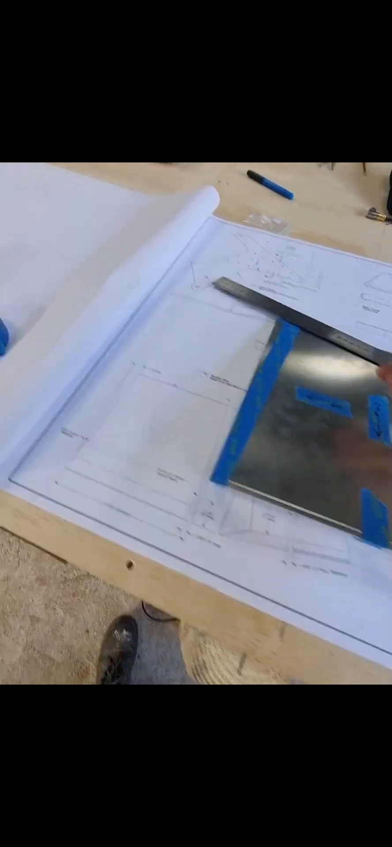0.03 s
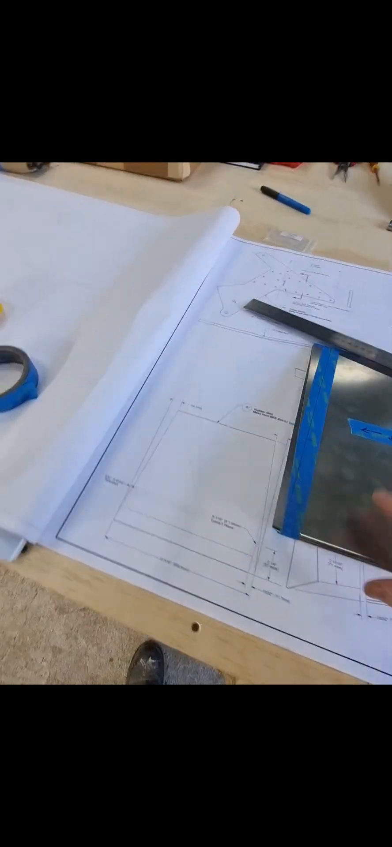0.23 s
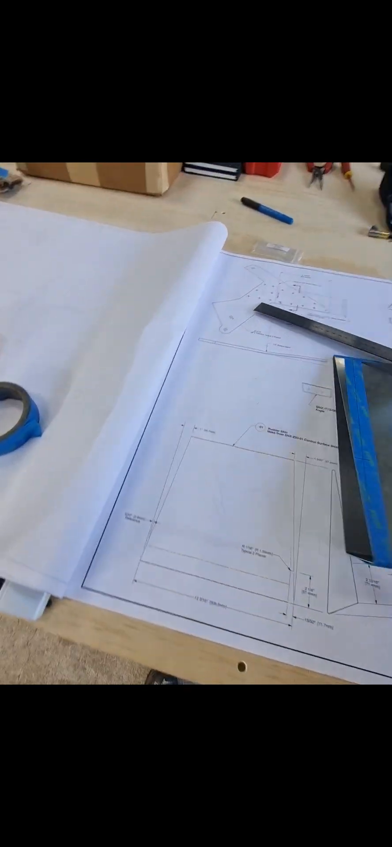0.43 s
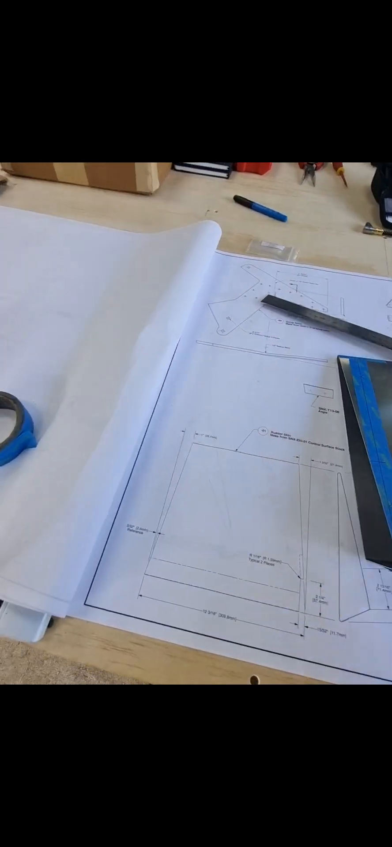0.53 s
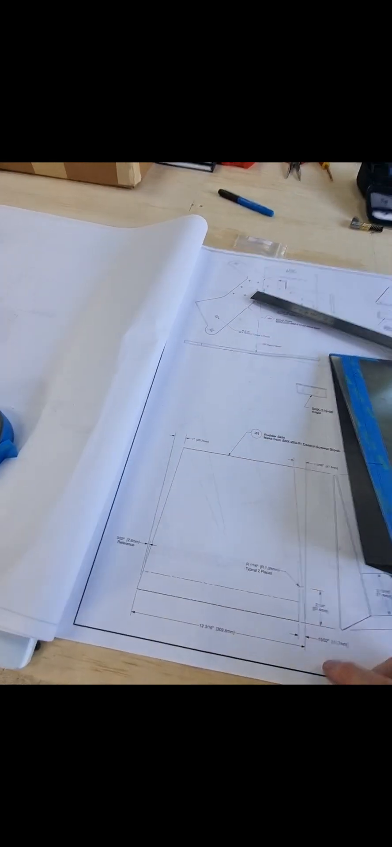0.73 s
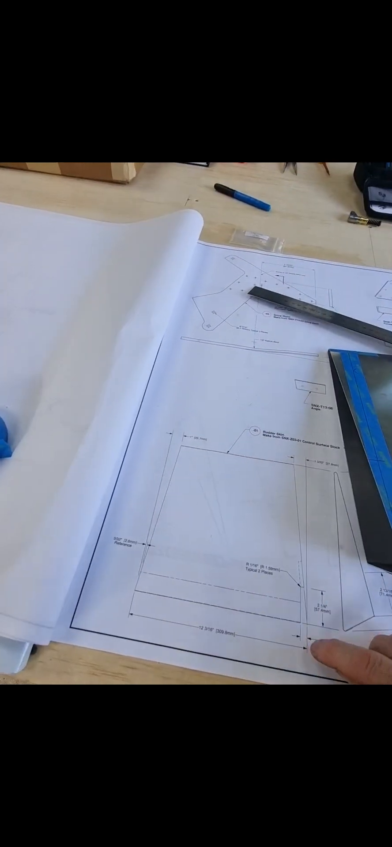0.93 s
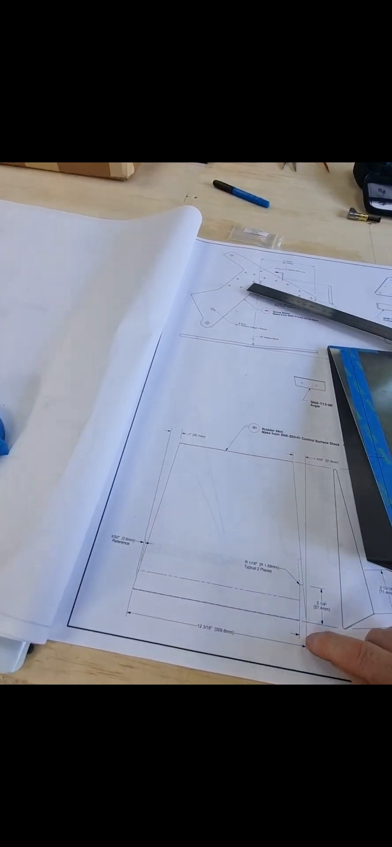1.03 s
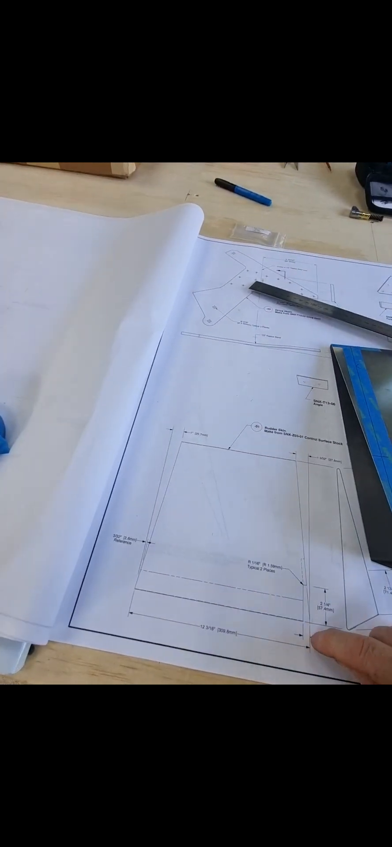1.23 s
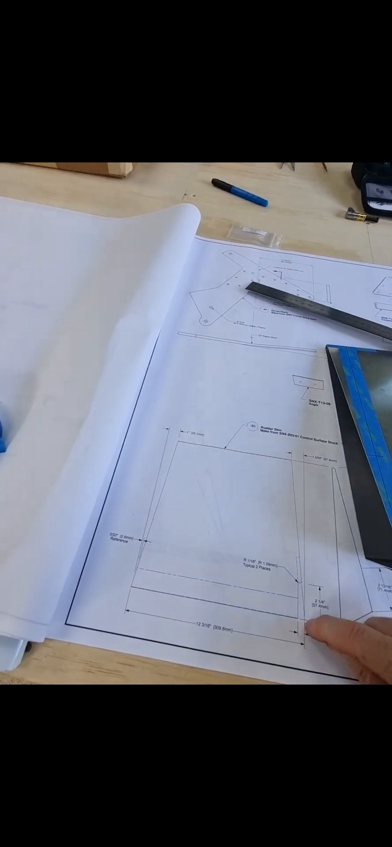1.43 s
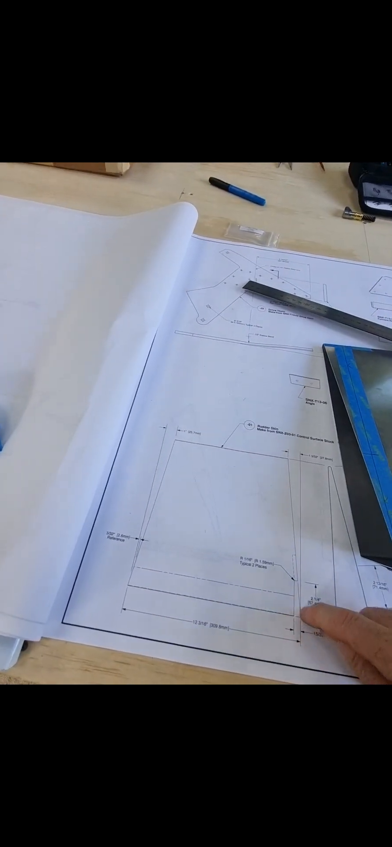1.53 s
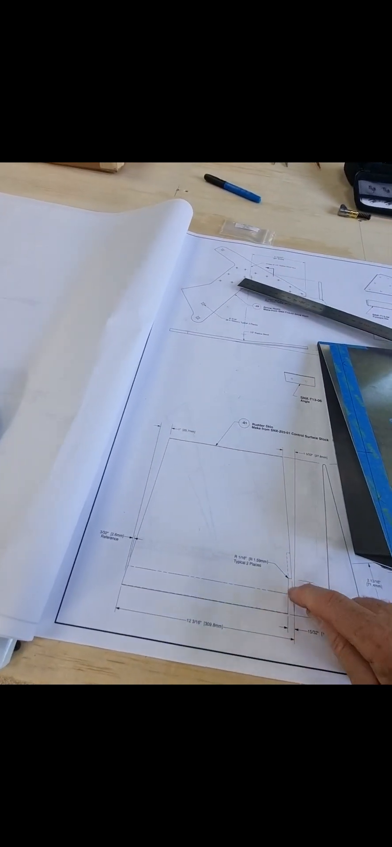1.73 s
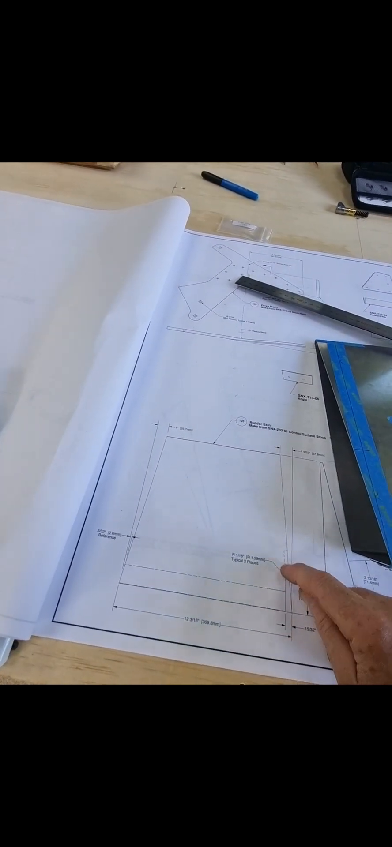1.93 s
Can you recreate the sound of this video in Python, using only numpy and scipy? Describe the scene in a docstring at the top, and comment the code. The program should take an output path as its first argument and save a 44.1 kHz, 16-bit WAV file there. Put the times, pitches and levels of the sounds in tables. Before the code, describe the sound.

A steel sheet scrapes and clatters across paper on a wooden bench, then settles into quiet

```python
"""A steel sheet is pushed over a paper drawing on a wooden bench, above a faint workshop hum.
0-0.3 s: its edge catches, judders and rasps: grainy noise booms the bench modes and rings the steel.
0.3-0.8 s: it glides off in swishes of friction noise, then settles with soft clicks and wooden notes.
From 0.5 s: fingertips stroke the paper in short bright noises and thump it dully; a crease snaps at 0.85 s.
From 1.7 s: a hand starts to sweep over the paper, as swelling, smeared friction noise."""
import sys
import numpy as np
from scipy import signal
from scipy.fft import rfft, irfft
from scipy.io import wavfile

SR = 44100
rng = np.random.default_rng(int(sys.argv[2]) if len(sys.argv) > 2 else 0)


def digitize_waveform(pressure):
    """Quantize a signal to 16-bit integers and store it at the path in sys.argv[1].

    Rows of a 2-D input are taken as channels; values are limited to [-1, 1].
    """
    field = np.atleast_2d(pressure).T
    bounded = np.clip(field, -1, 1)
    quanta = np.round(bounded * 32767).astype(np.int16)
    wavfile.write(sys.argv[1], SR, quanta)


N = 88200
T = np.arange(N) / SR

# Motor hum partials: pitch_hz, level_db
HUM_PARTIALS = [(70.5, -56), (111.4, -52), (222.8, -68.5), (588, -77.5)]
# Hum level over time: time_s, gain_db
HUM_GAIN = [(0, -0.5), (.9, -2.5), (1.4, -3.5), (1.7, -0.5), (1.82, 5), (2, -2)]
# Room air spectrum: freq_hz, density_db
AIR_SPECTRUM = [(20, -13.5), (45, -6.5), (75, -3.5), (110, -4), (160, -11.5), (250, -15), (360, -23.5),
                (580, -22.5), (750, -27), (1150, -31.5), (1500, -41.5), (2500, -48.5), (5000, -56),
                (15500, -60)]
# Room air level over time: time_s, gain_db
AIR_GAIN = [(0, 6), (.85, 5), (1, 0), (1.55, 2), (1.72, 4), (2, 6.5)]
# Thin steady hiss spectrum: freq_hz, density_db
HISS_SPECTRUM = [(300, -32), (3000, -26), (5700, -27.5), (6200, -25), (6700, -3), (7700, -0.5),
                 (9200, -9.5), (13000, -3), (15500, -9.5)]
HUM_WAVER_RAD, AIR_DB, HISS_DB = .12, -58, -63

# Fingertip strokes on the paper: start_s, length_s, level_db
FINGER_STROKES = [(.525, .07, -79), (0.633, 0.043, -55.5), (0.821, 0.036, -53.5), (1.008, 0.04, -56),
                  (1.197, .075, -59), (1.36, .04, -63), (1.403, .05, -57.5), (1.533, 0.038, -61.5)]
# Fingertip friction spectrum: freq_hz, density_db
FINGER_SPECTRUM = [(300, -29), (3000, -31), (6000, -26), (7300, -6), (8200, 8.5), (9500, -3.5),
                   (11000, 0.5), (13300, 7.5), (14300, -22), (16000, -22)]
# Hand sweep level over time: time_s, level_db
PALM_LEVEL = [(1.72, -65.5), (1.885, -61.5), (1.905, -54), (1.955, -48.5), (1.985, -41), (2, -39)]
# Palm friction spectrum: freq_hz, density_db
PALM_SPECTRUM = [(100, 0), (450, 2), (1200, -7.5), (2500, -14), (5000, -14), (6300, -3.5), (7800, 4.5),
                 (9500, -2.5), (11000, -15.5), (15500, -6.5)]
STROKE_ATTACK_S, STROKE_RELEASE_T60_S = .018, .23
FINGER_LEFT_MINUS_RIGHT_DB, PALM_LEFT_MINUS_RIGHT_DB = -2, 1

# Soft knocks of the settling sheet:
# start_s, note_db, note_hz, note_t60_s, click_db, click_t60_s, click_tilt_db_per_octave
SETTLING_TAPS = [(.5885, -47.5, 519, 0.33, -35, 0.029, -1), (0.7436, -41.5, 520, 0.024, -66.5, .02, -2),
                 (0.7508, -31.5, 590, 0.021, -44, 0.016, -0.5)]
# Dull wooden tail spectrum: freq_hz, density_db
WOOD_SPECTRUM = [(150, -23), (400, 5), (600, -2.5), (850, -3), (1200, -13), (1800, -29), (2500, -43),
                 (15000, -34)]
WOOD_DB, WOOD_T60_S = -11, .074  # dB relative to the note

# Snap of a paper crease: start_s, level_db, t60_s
CREASE_SNAPS = [(.852, -38.5, 0.0094)]
# Crease spectrum: freq_hz, density_db
SNAP_SPECTRUM = [(300, -26.5), (3300, -28), (4900, 5), (6000, -3), (7700, 2.5), (9000, -17), (15000, -12)]
# Glides of the flat face, then two dull finger thumps on the paper (0.864 and 1.1 s):
# peak_s, rise_s, fall_s, level_db, tilt_db_per_octave
GLIDES_AND_THUMPS = [(.36, 0.031, 0.013, -40.5, -12.5), (0.453, 0.11, 0.041, -40, -0.5),
                     (.55, .02, 0.06, -51, -0.5), (0.601, 0.018, 0.01, -45.5, -6.5),
                     (0.864, 0.021, 0.037, -63, -9), (1.1, 0.013, 0.027, -65.5, -10.5)]
# Paper spectrum: freq_hz, density_db
PAPER_SPECTRUM = [(80, -1.5), (400, -6), (750, -2.5), (1700, 2), (3000, 2.5), (5000, -0.5), (7800, 1.5),
                  (10000, -5.5), (15500, -4)]
GLIDE_RING_DB = -9

# Corner rasp: peak_s, rise_s, fall_s, level_db
CORNER_RASPS = [(.295, .04, 0.017, -33)]
# Corner scratch spectrum: freq_hz, density_db
CORNER_SPECTRUM = [(300, -27.5), (800, -8), (1300, -2), (1500, 4.5), (1700, 9.5), (2200, 3), (2500, -17),
                   (4600, -40.5), (5000, -4.5), (7200, -4.5), (8500, -29), (10200, -11), (15500, -16)]

# Judder of the sheet on the bench: time_s, pitch_hz, level_db
JUDDER_TRACK = [(.04, 85, -42.5), (.08, 92, -26.5), (0.128, 102, -23.5), (.2, 92, -33.5), (.235, 125, -34),
                (.29, 155, -31.5), (.335, 145, -38), (.375, 112, -40), (.46, 105, -49.5), (.55, 105, -68),
                (.7, 105, -90)]
JUDDER_WIDTH_HZ = 60

# Drag of the sheet: time_s, rumble_db, scrape_db
DRAG_LEVELS = [(0, -31.5, -35), (.016, -28.5, -33), (.021, -16, -27), (.052, -28, -28),
               (.064, -16.5, -30.5), (.11, -17, -31.5), (.14, -22.5, -29.5), (.175, -30, -45),
               (.195, -24, -78.5), (.228, -25.5, -47), (.246, -22.5, -33.5), (.268, -28.5, -69),
               (.295, -32, -42), (.35, -39.5, -66), (.42, -53.5, -63), (.52, -54.5, -58.5),
               (.61, -49.5, -63.5), (.72, -63, -66), (.95, -85, -100)]
# Hard catches of the edge: start_s, thud_db, clink_db
EDGE_KNOCKS = [(0.019, -37.5, -16), (0.0605, -21.5, -37.5), (0.069, -21, -24.5), (0.0917, -34, -30.5),
               (0.1345, -53, -34), (0.191, -22.5, -64), (0.209, -24.5, -30.5), (0.2795, -37.5, -38),
               (0.649, -48, -69)]
# Bench top and flexing sheet spectrum: freq_hz, density_db
BENCH_SPECTRUM = [(20, -50.5), (38, -41.5), (55, -9.5), (85, 3), (135, -4.5), (200, -2), (300, -4),
                  (390, 3), (480, -2), (600, -6.5), (690, -11.5), (820, -14.5), (1000, -11), (1290, -16),
                  (1600, -20), (2100, -19.5), (2600, -25.5), (5000, -47.5), (16000, -66.5)]
# Low resonances of the bench with the sheet on it: pitch_hz, level_db, t60_s
BENCH_RESONANCES = [(104, 0, .22), (151, -3, .22), (185, -3, .22), (228, -3, .22), (266, 0, .25),
                    (329, -3, .22), (383, 0, .18), (507, 2, .22), (589, 1, .2), (621, -5, .22)]
# Scraping edge spectrum: freq_hz, density_db
EDGE_SPECTRUM = [(100, -29.5), (700, -7), (1400, 1), (2600, -8), (4000, -2), (4680, -5), (4900, 3),
                 (5250, 1), (6200, -2.5), (7500, -4), (9000, -12), (11000, -11), (13000, -15.5),
                 (15500, -10.5)]
# Resonances of the steel: pitch_hz, level_db, t60_s
STEEL_RESONANCES = [(985, -3, .25), (1195, -1, .35), (1265, 2, .4), (1315, 0, .35), (1470, -3, .25),
                    (1853, -1, .35), (2130, -5, .25), (2789, -8, .3), (4100, -8, .2), (4840, -2, .4),
                    (4905, -2, .4), (4958, 0, .45), (5141, 2, .32), (5330, -2, .32), (5520, -3, .2),
                    (5880, -3, .2), (6174, -1, .28), (8183, -7, .22)]
CATCHES_PER_S, CATCH_SPREAD_DB, SMOOTH_SHARE = 800, 3.6, .3
THUD_T60_S, CLINK_T60_S = .083, .048
STRIKE_DB, STRIKE_T60_S = 3, .002  # dB relative to the thud
RUMBLE_DB, BOOM_DB, RING_DB = -2.5, -9.5, -3.5
DIRECT_DB, CLATTER_T60_S = -10, .025
SHIMMER_DB, SHIMMER_T60_S = -3.5, .26

# Stereo width: freq_hz, side_minus_mid_db
STEREO_WIDTH = [(60, -13), (200, -25), (380, -20.5), (560, -6), (750, -5.5), (1290, -1), (2400, 0.5),
                (5000, 1), (15000, 1)]
# Colour difference of the two microphones: freq_hz, left_minus_right_db
MICROPHONE_LEAN = [(60, 0.5), (200, 1.5), (380, 0), (750, -2), (1300, 0.7), (2400, 1.7), (4400, -1.5),
                   (8000, -1), (10000, -4), (14500, 2)]
# Room decay: freq_hz, t60_s
ROOM_DECAY = [(100, 0.38), (500, 0.4), (2000, 0.44), (6000, 0.21), (15000, 0.11)]
ROOM_DB, LOW_CUT_HZ, CUT_HZ = -11.5, 38, 15800


def amp(db):
    """Decibels to gain."""
    return 10 ** (np.asarray(db) / 20)


def unit(x):
    """Scales to rms 1."""
    return x / np.sqrt(np.mean(x ** 2) + 1e-20)


def read(points, hz):
    """Interpolates a table on a log-frequency axis."""
    freq_hz, value = np.transpose(points)
    return np.interp(np.log(hz + 1), np.log(freq_hz), value)


def level(points, index=1):
    """Gain over time from a column of dB."""
    rows = np.array(points)
    return amp(np.interp(T, rows[:, 0], rows[:, index]))


def through(x, response):
    """Convolves both channels with a response."""
    return signal.fftconvolve(np.atleast_2d(x), np.atleast_2d(response), axes=1)[:, :N]


def colour(x, points, tilt_db=0, size=4096):
    """Minimum-phase filter of unit energy with the given spectrum and tilt per octave."""
    hz = np.abs(np.fft.fftfreq(size, 1 / SR))
    octaves = np.log2(np.maximum(hz, 300) / 1000)
    gain = amp(read(points, hz) + tilt_db * octaves)
    gain = gain * np.where(hz > CUT_HZ + 800, .1, 1)
    taps = np.fft.ifft(np.exp(np.conj(signal.hilbert(np.log(gain))))).real
    return through(x, taps / np.linalg.norm(taps))


def spread(z):
    """Two unrelated signals become left and right: bass nearly mono, treble wide."""
    size = z.shape[1]
    side = amp(read(STEREO_WIDTH, np.fft.rfftfreq(size, 1 / SR)))
    a, b = rfft(z)
    left_right = np.array([a + side * b, a - side * b])
    return irfft(left_right / np.sqrt(1 + side ** 2), size)


def noise():
    """Stereo noise, white in each channel."""
    return spread(rng.standard_normal((2, N)))


def friction(per_s, spread_db, smooth):
    """Tiny catches of uneven size over a smooth hiss; smooth is the hiss share of power."""
    happens = rng.random(N) < per_s / SR
    size = amp(spread_db * np.minimum(rng.exponential(1, N), 3)) * happens
    grit = np.sqrt(signal.lfilter([1], [1, -.9], size ** 2))
    smooth = np.clip(smooth, 0, 1)
    return noise() * np.sqrt(smooth + (1 - smooth) * unit(grit) ** 2)


def dying(start_s, t60_s):
    """Sudden start and exponential decay."""
    return (T >= start_s) * amp(-60 * np.maximum(T - start_s, 0) / t60_s)


def swell(peak_s, rise_s, fall_s):
    """Gaussian rise and fall around a peak."""
    widths = np.where(T < peak_s, (peak_s - T) / rise_s, (T - peak_s) / fall_s)
    return np.exp(-widths ** 2 / 2)


def ringing(modes):
    """Unit-energy response of decaying modes; higher ones reach left and right out of step."""
    out = np.zeros((2, N))
    for hz, db, t60_s in modes:
        start_phase = 2 * np.pi * rng.random()
        offset = np.arctan(amp(read(STEREO_WIDTH, hz))) * rng.choice([-1, 1])
        phase = start_phase + np.array([[1], [-1]]) * offset
        out += amp(db) * unit(dying(0, t60_s) * np.sin(2 * np.pi * hz * T + phase))
    return unit(out) / np.sqrt(N)


def scatter(x, t60_s):
    """Decaying noise response: many close resonances that die away together."""
    return through(x, unit(noise() * dying(0, t60_s)) / np.sqrt(N))


def workshop():
    """Phase-wavering sines of a motor hum over room air and hiss."""
    hum = np.zeros(N)
    for hz, db in HUM_PARTIALS:
        waver = unit(signal.resample(rng.standard_normal(24), N))
        turns = hz * T + rng.random()
        hum += amp(db) * unit(np.sin(2 * np.pi * turns + HUM_WAVER_RAD * waver))
    air = amp(AIR_DB) * colour(noise(), AIR_SPECTRUM) * level(AIR_GAIN)
    hiss = amp(HISS_DB) * colour(noise(), HISS_SPECTRUM)
    return hum * level(HUM_GAIN) + air + hiss


def hand():
    """Skin friction: short fingertip strokes, then the palm sweeping over the paper."""
    sides = np.array([[.5], [-.5]])
    touch = np.zeros(N)
    for start_s, length_s, db in FINGER_STROKES:
        attack = np.clip((T - start_s) / STROKE_ATTACK_S, 0, 1)
        released_s = np.maximum(T - start_s - length_s, 0)
        touch += amp(db - 60 * released_s / STROKE_RELEASE_T60_S) * attack
    strokes = colour(friction(3000, 2.5, .41) * touch, FINGER_SPECTRUM)
    sweep = scatter(friction(1963, 3.9, .5) * level(PALM_LEVEL), t60_s=.039)
    sweep = colour(sweep, PALM_SPECTRUM)
    return (strokes * amp(FINGER_LEFT_MINUS_RIGHT_DB * sides)
            + sweep * amp(PALM_LEFT_MINUS_RIGHT_DB * sides))


def taps():
    """Each soft knock is a click, one short wooden note and a dull tail from the bench."""
    out = np.zeros((2, N))
    for start_s, db, hz, t60_s, click_db, click_t60_s, tilt_db in SETTLING_TAPS:
        out += amp(db) * dying(start_s, t60_s) * np.sin(2 * np.pi * hz * (T - start_s))
        click = noise() * amp(click_db) * dying(start_s, click_t60_s)
        out += colour(click, PAPER_SPECTRUM, tilt_db)
        tail = noise() * amp(db + WOOD_DB) * dying(start_s, WOOD_T60_S)
        out += colour(tail, WOOD_SPECTRUM)
    return out


def paper():
    """Swells of grainy noise for glides and finger thumps, with a faint steel ring; a crease snaps."""
    swishes = np.zeros((2, N))
    for peak_s, rise_s, fall_s, db, tilt_db in GLIDES_AND_THUMPS:
        swish = friction(2200, 3, .6) * amp(db) * swell(peak_s, rise_s, fall_s)
        swishes += colour(swish, PAPER_SPECTRUM, tilt_db)
    ring = amp(GLIDE_RING_DB) * through(swishes[0], ringing(STEEL_RESONANCES))
    snap = noise() * sum(amp(db) * dying(start_s, t60_s) for start_s, db, t60_s in CREASE_SNAPS)
    return swishes + ring + colour(snap, SNAP_SPECTRUM)


def rasp():
    """A corner of the sheet scratches along the paper: sparse catches, smeared."""
    push = sum(amp(db) * swell(peak_s, rise_s, fall_s)
               for peak_s, rise_s, fall_s, db in CORNER_RASPS)
    return scatter(colour(friction(400, 4.0, .25) * push, CORNER_SPECTRUM), t60_s=.065)


def judder():
    """A low tone, unsteady in pitch and level, follows the speed of the juddering."""
    times_s, pitch_hz, _ = np.transpose(JUDDER_TRACK)
    smooth = signal.butter(2, JUDDER_WIDTH_HZ / 2, fs=SR, output="sos")
    wobble = unit(signal.sosfilt(smooth, rng.standard_normal(N)))
    hz = np.interp(T, times_s, pitch_hz) + JUDDER_WIDTH_HZ / 4 * wobble
    turns = np.cumsum(hz) / SR
    shudder = unit(signal.sosfilt(smooth, rng.standard_normal(N)))
    tone = np.sin(2 * np.pi * turns) * (1 + .4 * shudder)
    return unit(tone) * level(JUDDER_TRACK, index=2)


def sheet():
    """The dragging edge and its hard catches shake the bench and ring the steel."""
    push = friction(CATCHES_PER_S, 2.5, .6) * level(DRAG_LEVELS, index=1)
    scrape = friction(CATCHES_PER_S, CATCH_SPREAD_DB, SMOOTH_SHARE) * level(DRAG_LEVELS, index=2)
    thuds = sum(amp(db) * dying(start_s, THUD_T60_S) for start_s, db, _ in EDGE_KNOCKS)
    clinks = sum(amp(db) * dying(start_s, CLINK_T60_S) for start_s, _, db in EDGE_KNOCKS)
    blows = sum(amp(db + STRIKE_DB) * dying(start_s, STRIKE_T60_S) for start_s, db, _ in EDGE_KNOCKS)
    push = push + noise() * thuds
    scrape = scrape + noise() * clinks

    rumble = amp(RUMBLE_DB) * colour(push, BENCH_SPECTRUM)
    boom = through(amp(BOOM_DB) * push.mean(0) + blows, ringing(BENCH_RESONANCES))
    edge = colour(scrape, EDGE_SPECTRUM)
    clatter = amp(DIRECT_DB) * edge + scatter(edge, CLATTER_T60_S)
    shimmer = amp(SHIMMER_DB) * scatter(edge, SHIMMER_T60_S)
    ring = amp(RING_DB) * through(scrape[0], ringing(STEEL_RESONANCES))
    return rumble + boom + clatter + shimmer + ring


def room(x):
    """A short diffuse tail, each band dying at its own speed."""
    hz, time_s, z = signal.stft(noise(), SR, nperseg=256)
    decay = amp(-60 * time_s / read(ROOM_DECAY, hz)[:, None])
    tail = signal.istft(z * decay, SR, nperseg=256)[1][:, :N]
    onset = np.minimum(T / .0058, 1)
    return through(x, unit(tail * onset) / np.sqrt(N))


def scene():
    """The near sounds with a low cut, their room tail and the background."""
    background = workshop()
    near = hand() + taps() + paper() + rasp() + judder() + sheet()
    near = signal.sosfilt(signal.butter(4, LOW_CUT_HZ, "high", fs=SR, output="sos"), near)
    return background + near + amp(ROOM_DB) * room(near)


def record(dry):
    """The two microphones differ a little in colour; then the band limit."""
    lean_db = read(MICROPHONE_LEAN, np.fft.rfftfreq(N, 1 / SR)) * np.array([[.5], [-.5]])
    heard = irfft(rfft(dry) * amp(lean_db), N)
    low_pass = signal.firwin(801, CUT_HZ, window=("kaiser", 9), fs=SR)
    return signal.oaconvolve(heard, low_pass[None], "same")


dry = scene()
out = record(dry)
digitize_waveform(out)
```